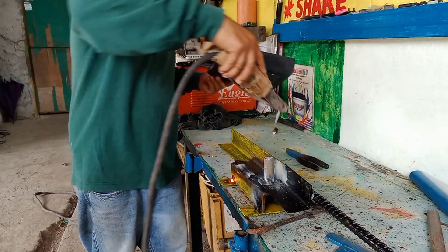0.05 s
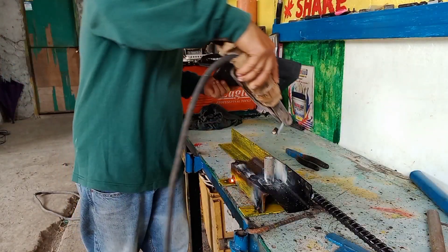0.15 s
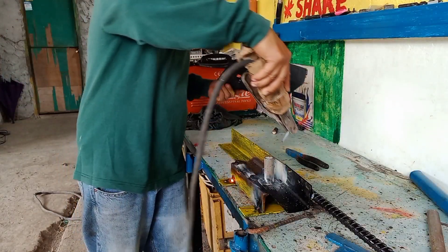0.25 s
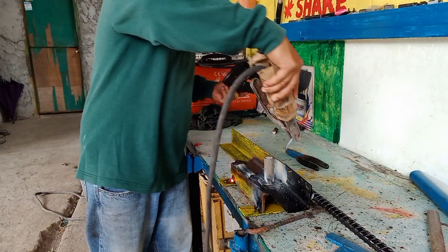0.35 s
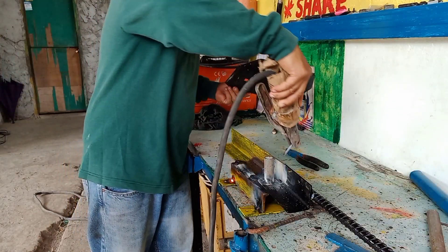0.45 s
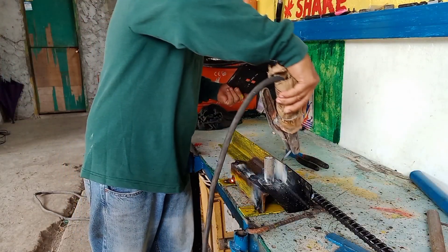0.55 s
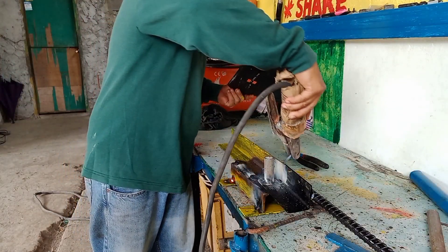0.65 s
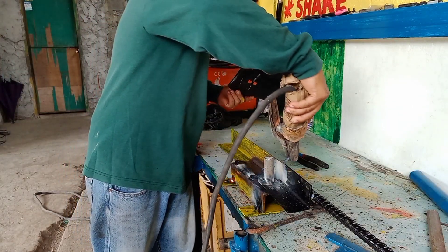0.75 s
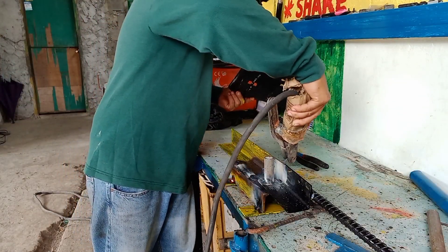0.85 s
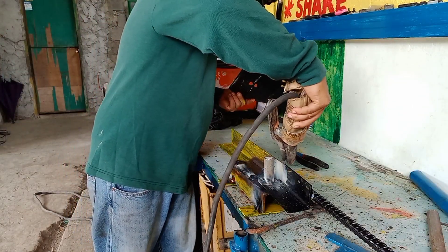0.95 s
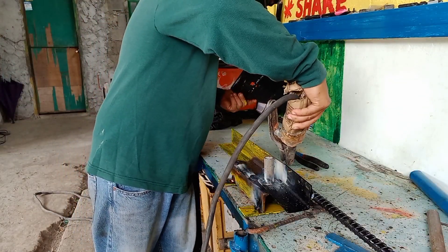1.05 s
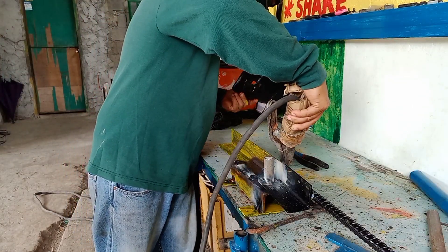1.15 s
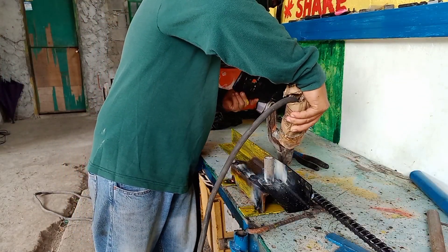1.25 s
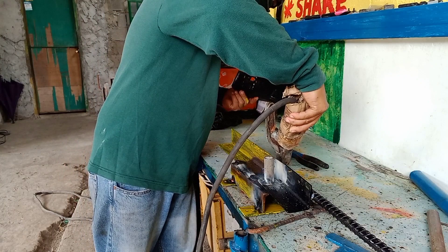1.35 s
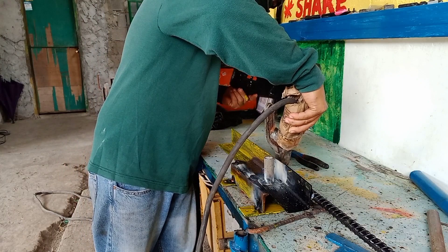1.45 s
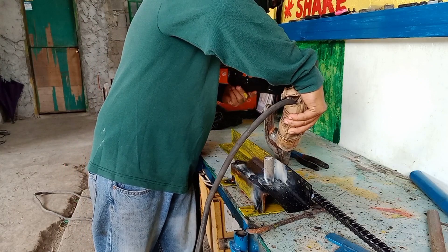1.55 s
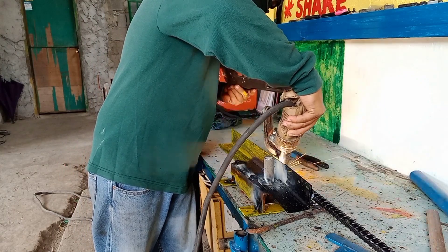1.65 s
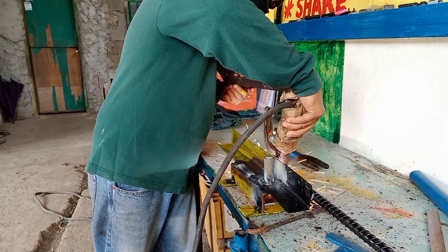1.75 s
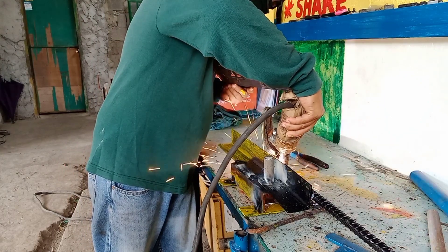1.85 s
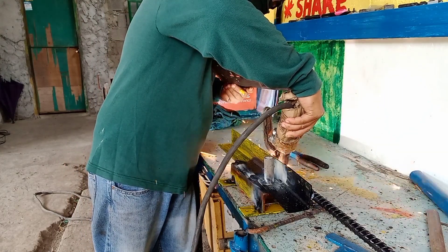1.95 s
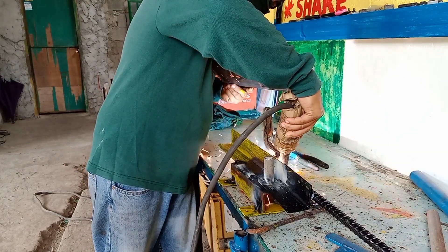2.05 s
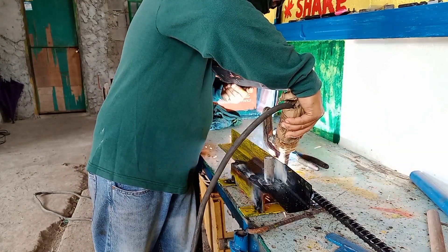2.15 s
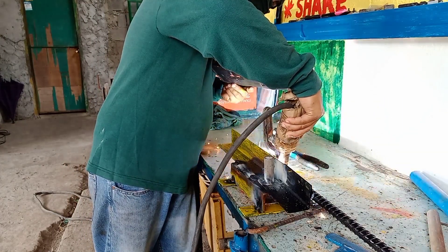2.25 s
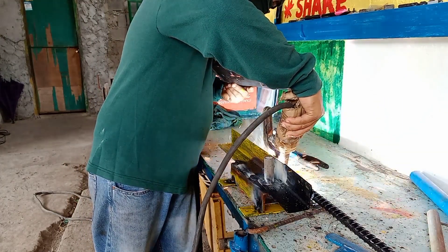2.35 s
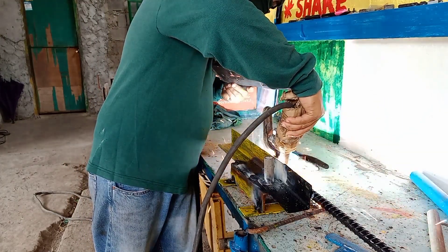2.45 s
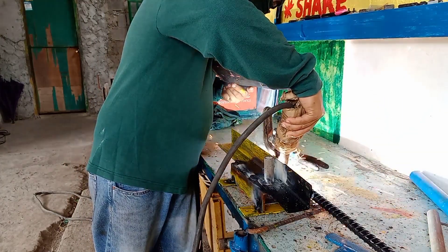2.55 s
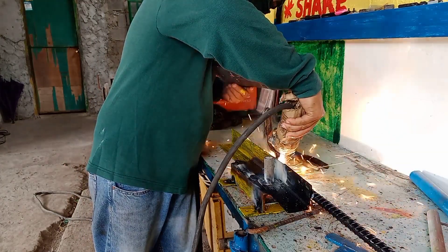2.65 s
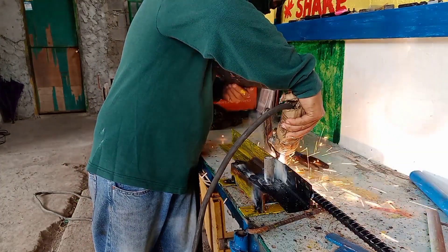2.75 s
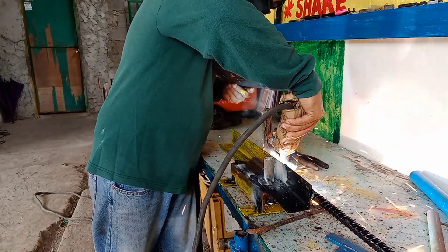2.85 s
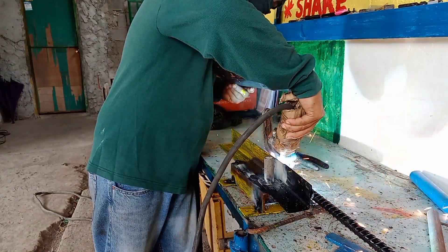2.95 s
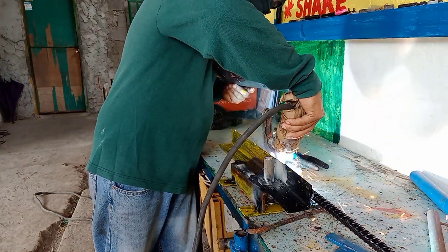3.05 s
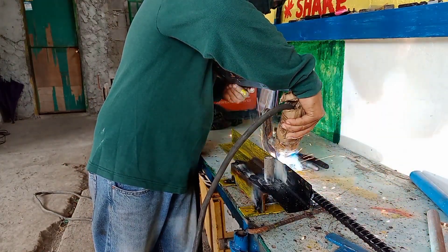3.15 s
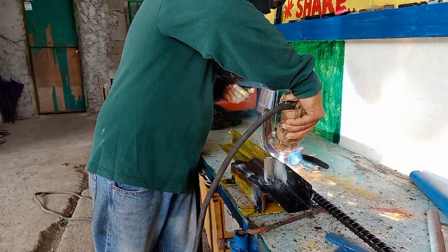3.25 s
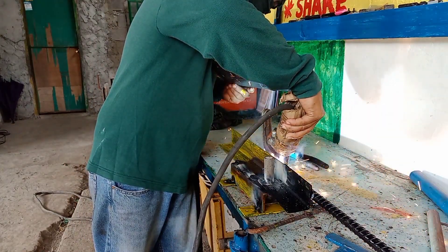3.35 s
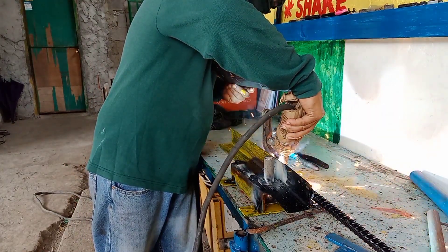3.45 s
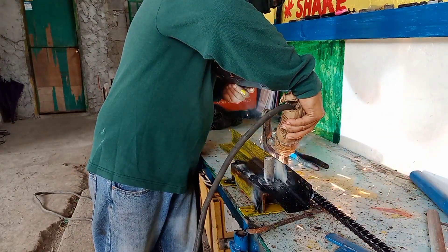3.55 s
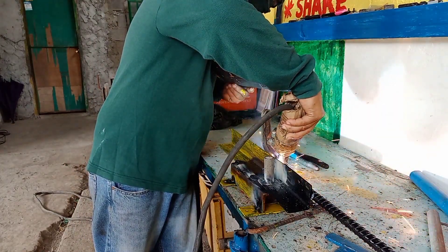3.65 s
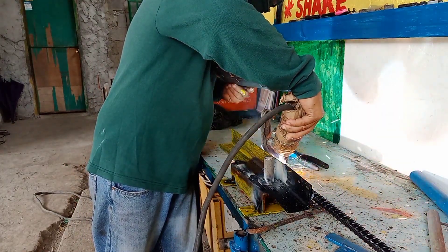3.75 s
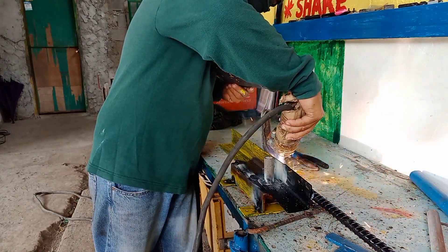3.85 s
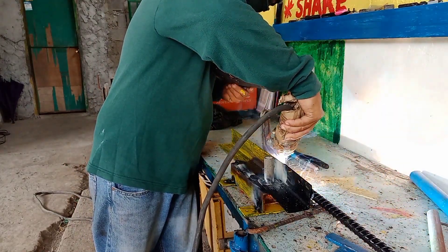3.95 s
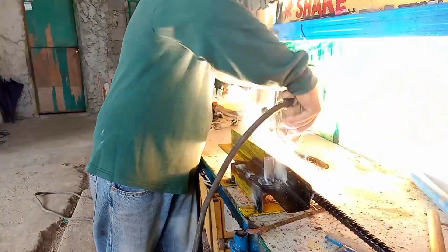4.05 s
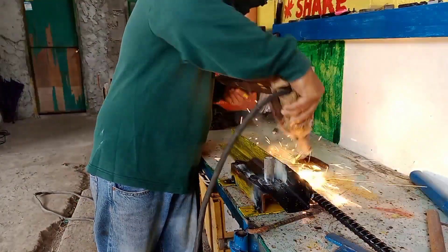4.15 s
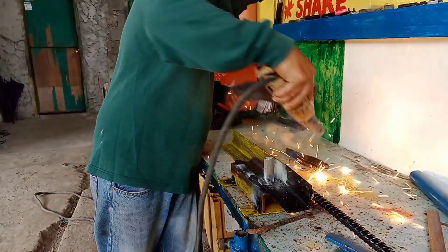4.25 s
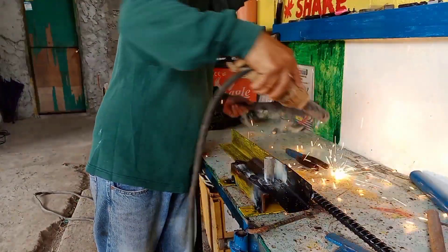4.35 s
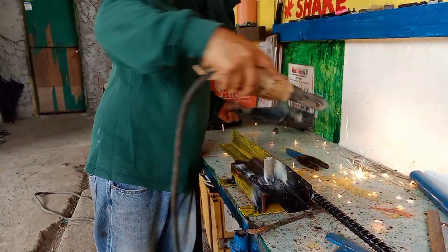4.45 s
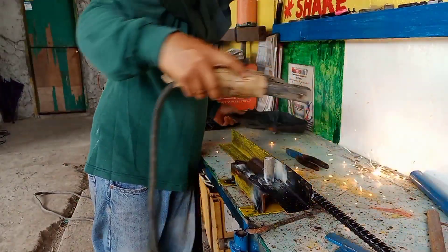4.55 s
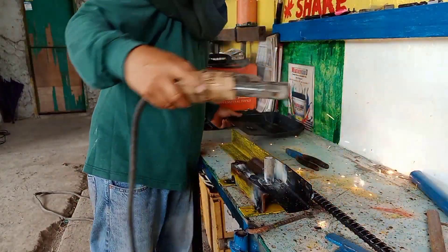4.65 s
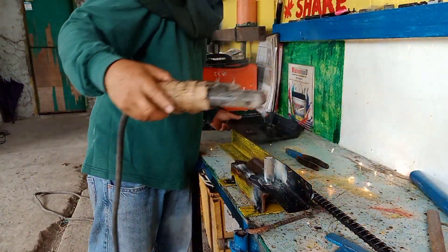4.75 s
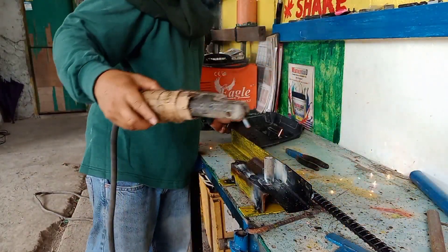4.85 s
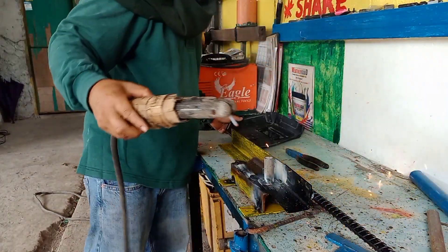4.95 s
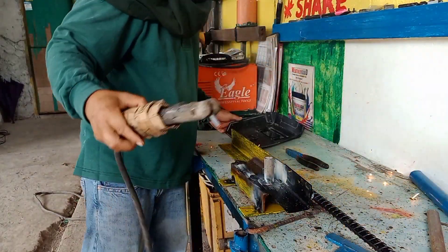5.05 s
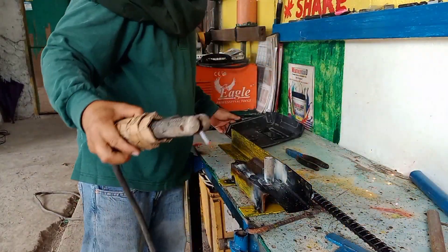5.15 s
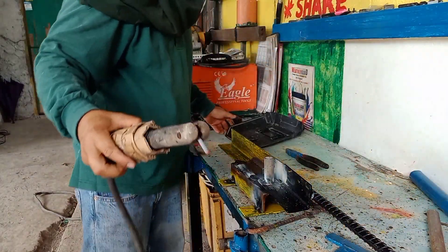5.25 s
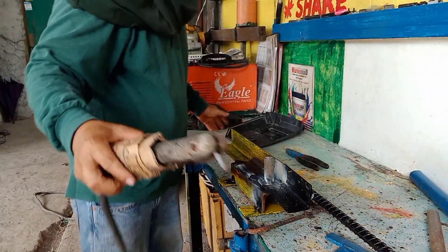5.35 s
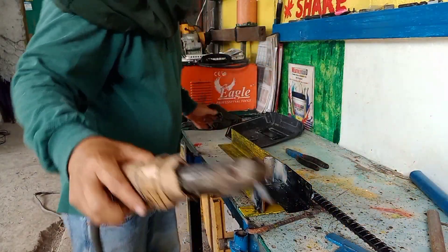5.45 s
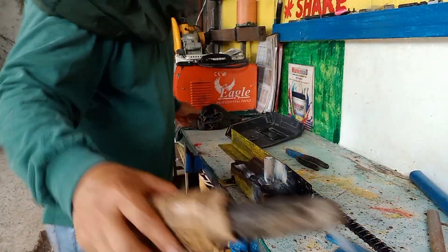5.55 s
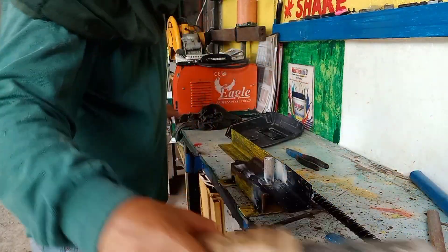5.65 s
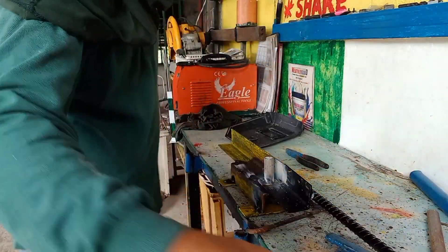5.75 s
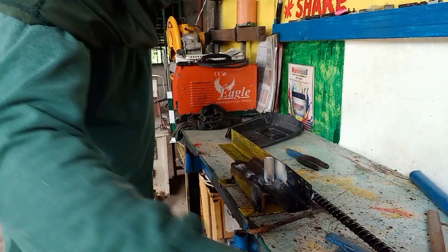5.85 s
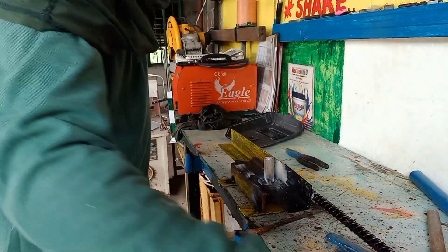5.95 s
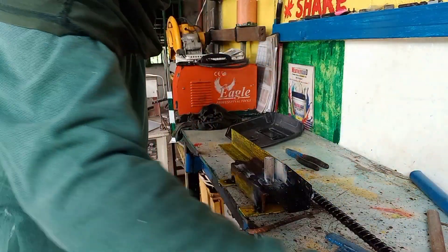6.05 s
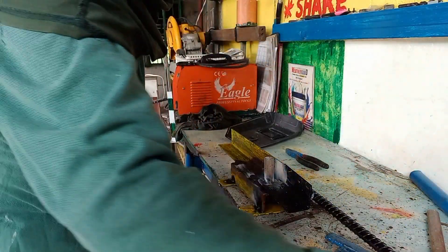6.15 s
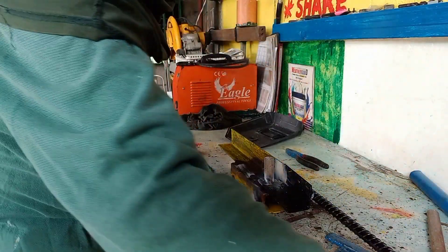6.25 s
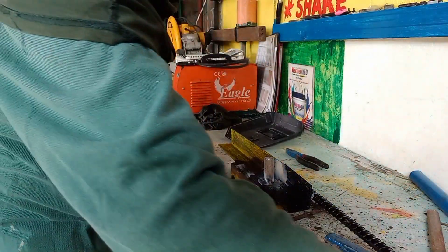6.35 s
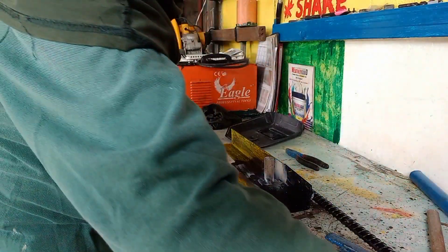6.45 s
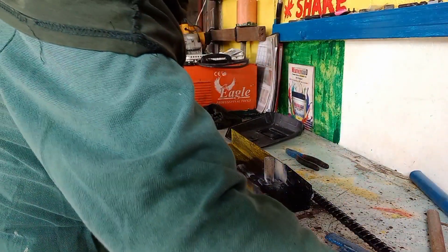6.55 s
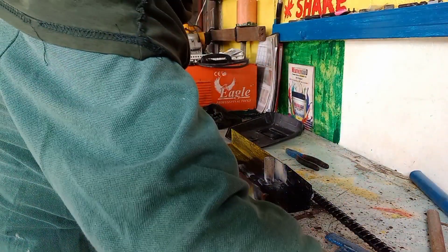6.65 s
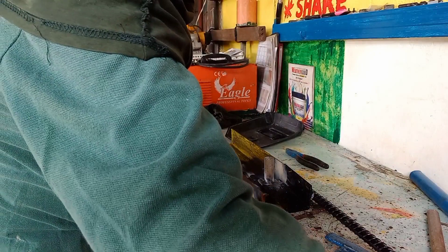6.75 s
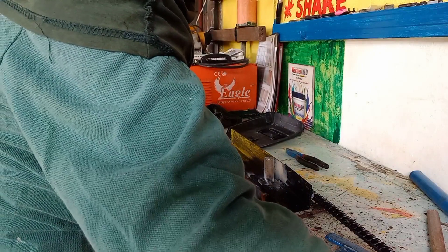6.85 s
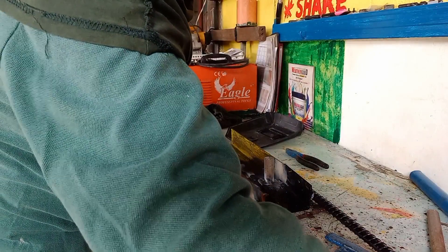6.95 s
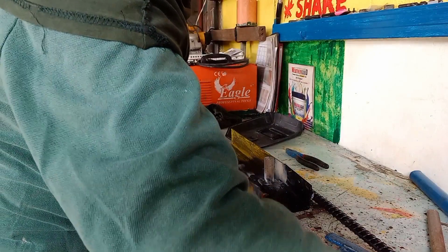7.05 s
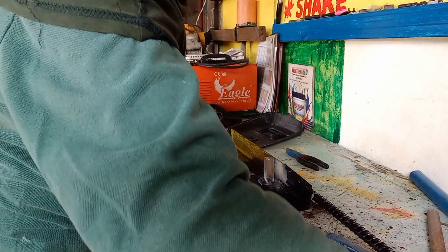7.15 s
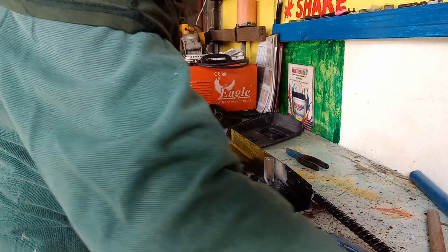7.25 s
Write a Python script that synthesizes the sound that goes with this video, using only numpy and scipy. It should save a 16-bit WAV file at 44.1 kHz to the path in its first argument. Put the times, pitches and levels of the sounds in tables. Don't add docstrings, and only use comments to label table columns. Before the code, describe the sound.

Close stereo sound at a welding bench: quiet scuffs and creaks over a steady hum, then a harsh arc catches, rasping and spitting bright snaps with dull spatter thuds on the microphone. It cuts off after some two and a half seconds, leaving a thin cooling sizzle, small ticks, a bench knock and clothing movement as the hum gradually returns.

```python
import sys
import numpy as np
from scipy import signal
from scipy.fft import rfft, irfft, next_fast_len
from scipy.io import wavfile
from scipy.ndimage import uniform_filter1d

SR = 44100
rng = np.random.default_rng(int(sys.argv[2]) if len(sys.argv) > 2 else 0)


def unload_wav(signal):
    wavfile.write(
        sys.argv[1],
        SR,
        np.round(np.clip(np.atleast_2d(signal).T, -1, 1) * 32767).astype(np.int16),
    )


def boost(x):
    u = np.asarray(x, float) / 20
    return 10 ** u


N = 321482
TIME, PADDED = np.arange(N) / SR, next_fast_len(N, real=True)
RIPPLE_HZ, RIPPLE_PEAK_S = 120.35, 0.0052
BURN_START_S, BURN_END_S = 1.63, 3.95

# time in seconds, level in dB, rise and fall in seconds.
FLARES = [
    (1.651, -22.5, 0.0051, 0.01),
    (1.675, -31, 0.0067, 0.0071),
    (1.698, -10.5, 0.0061, 0.0078),
    (1.762, -39, 0.011, 0.037),
    (4.053, -26, 0.012, 0.015),
]
# time in seconds, gain in dB.
GAIN = [
    (0, 3),
    (1.7, 1.5),
    (3, -11),
    (4.2, -9),
    (5.0, -7),
    (5.28, -1),
    (6, 1),
    (6.6, 2.5),
    (7.3, 3.5),
]


def level(x, db):
    return x * boost(db) / np.sqrt(np.mean(x ** 2))


def curve(table, column, outside=-120):
    rows = np.array(table, float)
    return np.interp(TIME, rows[:, 0], rows[:, column], left=outside, right=outside)


def along_hz(points):
    hz, value = np.transpose(points)
    bins_hz = np.arange(PADDED // 2 + 1) * SR / PADDED
    return np.interp(np.log(bins_hz + 1), np.log(hz), value)


def colour(x, points):
    gain = boost(along_hz(points))
    gain = gain / np.sqrt(np.mean(gain ** 2))
    return irfft(rfft(x, PADDED) * gain, PADDED)[..., :N]


def band(x, hz, width_hz):
    return signal.lfilter(*signal.iirpeak(hz, hz / width_hz, SR), x)


def narrow_band(x, hz, width_hz):
    return band(band(x, hz, width_hz), hz, width_hz)


def walk(rate):
    k = int(SR / rate)
    held = np.repeat(rng.standard_normal(N // k + 1), k)
    return 1.79 * uniform_filter1d(uniform_filter1d(held, k), k)[:N]


def swell(s, rise_s, fall_s):
    span = slice(max(int((s - 8 * rise_s) * SR), 0), min(int((s + 8 * fall_s) * SR), N))
    t = TIME[span] - s
    return span, np.exp(np.where(t < 0, t / rise_s, -t / fall_s))


def swells(rows):
    out = np.zeros(N)
    for s, db, rise, fall in rows:
        span, shape = swell(s, rise, fall)
        out[span] += boost(db) * shape
    return out


def wide(points):
    # frequency in Hz, left-right likeness from -1 to 1.
    likeness = [(60, 1), (300, 0.73), (640, 0.61), (1400, -0.27), (16000, -0.11)]
    alike = np.clip(along_hz(likeness), -1, 1)
    mid, side = rfft(rng.standard_normal((2, PADDED)))
    mid = mid * np.sqrt((1 + alike) / 2)
    side = side * np.sqrt((1 - alike) / 2)
    return colour(irfft(np.array([mid + side, mid - side]), PADDED), points)


def arc():
    # time in seconds, level in dB.
    burning = [(1.626, -50), (1.636, -35.5), (1.69, -23), (1.8, -36), (2.1, -39), (2.5, -34), (2.7, -41.5),
               (2.8, -34), (2.88, -45.5), (2.92, -46), (3.0, -38.5), (3.19, -47), (3.3, -43), (3.7, -42),
               (3.96, -45), (4.05, -41.5), (4.1, -62)]
    # frequency in Hz, level in dB per Hz.
    hiss_tone = [(2350, -83), (4000, -8.5), (5500, -11), (7070, -12.5), (8050, -3), (9850, -8), (10700, -4),
                 (12200, -3), (14400, -3.5), (15300, 0), (16500, -33)]
    # frequency in Hz, level in dB per Hz.
    roar_tone = [(240, -8), (400, -3.5), (693, -2), (912, -6), (1970, 2), (2830, -7), (3310, -3),
                 (4700, -10), (5600, -27), (6500, -85), (11000, -120)]
    ripple = np.cos(2 * np.pi * RIPPLE_HZ * (TIME - RIPPLE_PEAK_S))
    cycle = np.round(RIPPLE_HZ * (TIME - RIPPLE_PEAK_S)).astype(int)
    luck = rng.random(N // 300)[cycle] ** 1.55
    flare = boost(12.3 * (ripple + 1) / 2 * luck + 1.3 * walk(29.76))
    treble = boost(curve(burning, 1) + 1) * flare
    body = boost(curve(burning, 1) - 11) * boost(1.44 * walk(45)) * flare
    growl = swells([(s, db - 16, 0.025, 0.03) for s, db, *_ in FLARES]) * (TIME > BURN_START_S) * flare

    snap, thud = np.zeros((2, N))
    for s, db, body_db, ms in pops():
        span, broad = swell(s, 0.00037 * ms, 0.00046 * ms)
        crack_span, crack = swell(s, 0.00008, 0.0003)
        treble[span] += boost(db + 2) * broad
        treble[crack_span] += boost(db + 7.5) * crack
        body[span] += boost(db + body_db) * broad
        body[crack_span] += boost(db + body_db - 17) * crack
        snap[int(s * SR)] = -boost(db + 14)
        thud[int(s * SR)] = -boost(db + body_db + 13)

    common, *own = rng.standard_normal((3, N)) * boost(3.15 * rng.standard_normal((3, N)))
    plasma = level(common + 0.9 * np.array(own), 0)
    sound = colour(plasma * treble + snap, hiss_tone)
    sound += boost(5) * colour(plasma[:, ::-1] * body + thud, roar_tone)
    sound += boost(10) * band(np.roll(plasma, shift=SR, axis=1) * growl, 1400, 2100)
    sound = signal.lfilter(*signal.butter(2, 87, "high", fs=SR), sound)
    return np.array([sound[0], np.roll(sound[1], shift=13) * boost(-1.5)])


def pops():
    # time in seconds, peak in dB, body minus treble in dB, length in ms.
    singles = [(1.6416, -27, -9, 4.6), (1.777, -14.5, -28, 5.3), (1.8905, -14, -24, 3.5),
               (1.9083, -9, -14, 2.6), (2.0299, -25, -15, 5.6), (2.0477, -18, -14, 1.9),
               (2.2731, -24.5, -10, 8.8), (2.3049, -19.5, -14, 5), (2.3458, -17.5, -13, 3.6),
               (2.3717, -12, -6.5, 2), (2.412, -21.5, -9, 3.3), (2.438, -19.5, -0.5, 1.9),
               (2.4909, -9, -12.5, 1.8), (2.496, -10, -6.5, 1.8), (2.6123, -22.5, -9.5, 5.9),
               (2.6305, -24, -9.5, 5.7), (2.6547, -21.5, -1.5, 0.95), (2.753, -18, -4, 6.1),
               (3.0022, -23.5, -9.5, 2.3), (3.02, -21.5, -14.5, 4.5), (3.097, -26, -16, 5.2),
               (3.119, -20.5, -22, 4.2), (3.234, -19, -18, 1.3), (3.2695, -18.5, -8, 3.1),
               (3.3356, -16.5, -5, 1.1), (3.3683, -22, -7.5, 2.3), (3.585, -18, -9, 4.4),
               (3.6349, -22.5, -4.5, 3.6), (3.6866, -23, -5.5, 1.7), (3.9111, -27, -4, 2.5),
               (3.916, -31.5, -1, 2.7)]
    # time in seconds, first peak in dB, second peak in dB, body minus treble in dB.
    doubles = [(1.6545, -26.5, -19.5, 3), (1.698, -26, -19, -1), (1.7157, -14, -14, -19),
               (1.8071, -14, -15.5, -8), (2.1851, -21, -20, -10), (2.7196, -28, -23, -21),
               (3.1364, -22, -24, -14.5), (3.1607, -19, -12.5, -7.5), (3.2511, -20.5, -31, -6.5),
               (3.385, -19, -21, -17), (3.443, -23, -27, -11.5), (3.4948, -24.5, -26, -18),
               (3.783, -20, -20.5, -11), (3.827, -39, -25, -11), (3.868, -19.5, -22, -5),
               (3.9423, -18.5, -17, -2.5), (4.0425, -42, -34, 1.5)]
    # time in seconds, peak in dB.
    spits = [(1.633, -33), (1.6745, -16), (1.683, -33), (1.733, -36), (1.9015, -26), (1.8397, -26),
             (1.8546, -28), (1.883, -27), (1.9796, -41), (2.0431, -29), (2.0505, -42), (2.056, -35),
             (2.101, -53), (2.1061, -25), (2.25, -28), (2.261, -32), (2.3345, -26), (2.2984, -30),
             (2.432, -25), (2.4804, -22), (2.521, -22), (2.5988, -31), (2.6054, -26), (2.6706, -32),
             (2.679, -34), (2.7367, -27), (2.763, -24), (2.795, -39), (2.813, -38), (2.847, -30),
             (2.878, -29), (2.888, -37), (2.9062, -33), (2.9305, -33), (2.7693, -23), (2.829, -31),
             (2.8623, -30), (2.946, -23), (3.006, -29), (3.045, -40), (3.084, -25), (3.089, -30),
             (3.176, -24), (3.228, -43), (3.3465, -29), (3.311, -33), (3.5191, -26), (3.525, -23),
             (3.536, -27), (3.562, -22), (3.611, -39), (3.629, -39), (3.852, -51), (3.937, -33),
             (3.745, -26)]
    spit_body_db, spit_ms = -19, 3.6
    again_s, double_ms = 0.0093, 3.25

    twice = []
    for s, first_db, second_db, body_db in doubles:
        twice.append((s, first_db, body_db, double_ms))
        twice.append((s + again_s, second_db, body_db - 3, double_ms))
    thin = [(s, db, spit_body_db, spit_ms) for s, db in spits]

    first, last = np.round(np.array([BURN_START_S, BURN_END_S]) * RIPPLE_HZ)
    peaks = np.arange(first, last) / RIPPLE_HZ + RIPPLE_PEAK_S
    luck = rng.standard_normal((len(peaks), 4))
    faint = []
    for k in np.argsort(luck[:, 0])[:int(0.1 * len(peaks))]:
        s = peaks[k] + 0.0017 * luck[k, 1]
        faint.append((s, -37 + 2.5 * luck[k, 2], spit_body_db + 5 * luck[k, 3], spit_ms))
    return singles + twice + thin + faint


def pulses(orders, phase):
    return level(sum(boost(db + 1.5 * walk(20)) * np.cos(k * phase) for k, db in orders), 0)


def buzz():
    # multiple of the ripple, level in dB.
    steady_orders = [(1, 3.5), (2, -8), (3, -17), (4, -8.5), (5, -45), (6, -8.5), (8, -52)]
    # multiple of the ripple, level in dB.
    breaking_orders = [(1, 2.5), (2, 0), (3, -12.5), (4, -10), (6, -7)]
    # time in seconds, level in dB.
    drone_levels = [
        (1.62, -45.5),
        (2.85, -44.5),
        (3.15, -61.5),
        (4.15, -51.5),
    ]
    # time in seconds, level in dB, rise and fall in seconds.
    rattles = [
        (1.64, -28, .003, .013),
        (1.685, -16.5, 0.0065, 0.017),
        (1.75, -32.5, .004, 0.024),
        (4.022, -35.5, 0.0044, 0.028),
        (4.041, -30, 0.0037, 0.0069),
        (4.052, -32, .003, .003),
    ]
    phase = 2 * np.pi * RIPPLE_HZ * (TIME - RIPPLE_PEAK_S) + 0.53
    steady = pulses(steady_orders, phase)
    breaking = pulses(breaking_orders, phase)
    rattle = rng.standard_normal(N) * np.exp(0.34 * np.cos(phase))
    rattle = level(band(band(rattle, 670, 380), 650, 400), -2.4)
    drone = boost(curve(drone_levels, 1))
    flaring = swells(FLARES) * np.where(TIME < BURN_END_S, steady, breaking)
    shake = drone * boost(-6) + swells(rattles)
    return drone * steady + flaring + shake * rattle


def thumps():
    # time in seconds, port, size of pressure step, size of click, click delay in ms.
    hits = [(1.8164, 0, 0.24, -0.77, -0.32), (1.8399, 0, -0.25, 0.069, -0.26),
            (1.8877, 0, -0.0089, -0.23, 0.34), (1.908, 0, 0.44, 0.066, -0.32),
            (2.0562, 0, -0.24, -0.013, 0.041), (2.106, 0, -0.47, -0.46, -0.11),
            (2.4374, 0, -0.42, -0.22, -0.23), (2.5214, 0, 0.4, 0.24, 0.053),
            (2.6705, 0, -0.047, 0.07, -0.11), (2.6789, 0, -0.16, 0.069, 0.22), (2.737, 0, 1, 0.48, -0.12),
            (2.7436, 0, -1.16, -0.79, -0.1), (2.754, 0, -0.15, -1.44, -0.24), (2.7638, 1, 1, 0.51, -0.089),
            (2.7688, 0, -0.19, 0.48, -0.47), (2.9064, 0, 0.46, 0.39, -0.11),
            (2.9295, 0, 0.15, -0.63, -0.39), (2.945, 0, -0.28, -1, 0.091), (2.9458, 1, 0.35, 0.35, -0.096),
            (3.17, 0, 0.0085, -0.52, -0.11)]
    jump, click = np.zeros((2, 2, N))
    for s, port, step, tap, ms in hits:
        jump[port, int(s * SR)] = step
        click[port, int((s + ms / 1000) * SR)] = tap
    push = boost(6.5) * np.cumsum(jump, axis=1) + boost(20) * band(click, 1440, 1070)
    push = signal.lfilter(*signal.butter(2, 5500, fs=SR), push)
    for low_cut_hz in (61, 76):
        push = signal.sosfilt(signal.butter(4, low_cut_hz, "high", fs=SR, output="sos"), push)
    return push


def bead():
    # frequency in Hz, level in dB per Hz.
    sizzle_tone = [(1470, -17), (2500, -9), (3860, -3.5), (5010, -1.5), (5460, -1), (6920, -3.5),
                   (8560, -4.5), (9340, -3.5), (10300, -5), (14400, -6), (15400, -3), (16500, -11.5)]
    # frequency in Hz, width in Hz, level in dB.
    bar_ring = [(8780, 160, -16.5), (10460, 110, -16.5), (12060, 1100, -12.5), (14100, 3400, -10)]
    # time in seconds, level in dB, fall in seconds.
    puffs = [
        (4.049, -28, 0.0049),
        (4.58, -66, 0.022),
    ]
    break_s, start_db, cool_db_per_s = 4.05, -46, 4
    cooling_db = start_db - cool_db_per_s * (TIME - break_s)
    steady = (TIME > break_s) * boost(cooling_db + 0.84 * curve(GAIN, 1))
    hiss = wide(sizzle_tone) * boost(0.16 * walk(28))
    ring = sum(level(band(hiss, hz, width), db) * boost(2.1 * walk(22)) for hz, width, db in bar_ring)
    puffing = swells([(s, db, 0.003, fall) for s, db, fall in puffs])
    return (hiss + ring) * (steady + puffing)


def handling():
    # time in seconds, level in dB, rise in seconds, fall in seconds, centre in Hz.
    scuffs = [(.2, -62.5, 0.23, 0.79, 4660), (6.051, -63, 0.16, 0.25, 2490), (.4, -55, 0.12, 0.11, 1380),
              (.775, -49, 0.0086, 0.073, 1050), (1.27, -63, 0.053, 0.076, 1290),
              (1.382, -55.5, 0.039, 0.053, 1470), (5.4, -60.5, 0.062, 0.082, 1220),
              (5.7, -58.5, 0.055, 0.12, 2190), (6.492, -43, 0.003, 0.053, 280),
              (6.5, -54, .005, 0.045, 900), (6.72, -62, 0.021, 0.036, 740),
              (6.874, -45.5, 0.0029, 0.082, 1580), (6.875, -59, 0.0029, 0.045, 3800),
              (6.95, -43.5, 0.041, 0.028, 670), (7.27, -56, 0.013, 0.061, 1310)]
    # time in seconds, level in dB, rise in seconds, fall in seconds, centre in Hz.
    groans = [
        (.2, -63, .12, 0.4, 55.4),
        (.25, -44.5, 0.069, 0.11, 195),
    ]
    # time in seconds, level in dB.
    creaks = [(.03, -59), (.072, -53), (.335, -53), (.69, -56), (.71, -55), (.895, -52), (1.025, -53),
              (1.1, -59), (1.2, -63), (1.262, -57), (1.3, -53), (1.4, -58), (1.485, -60), (1.572, -66),
              (4.51, -60), (4.77, -54), (5.13, -58), (5.34, -47), (5.42, -55), (5.58, -46), (5.66, -49),
              (5.885, -50), (6.225, -49), (6.28, -57), (6.56, -47)]
    # time in seconds, level in dB, fall in seconds, centre in Hz, width in Hz.
    ticks = [(0.229, -54, 0.097, 1800, 620), (.56, -56.5, 0.026, 1700, 220), (9.2, -54, .015, 2440, 300),
             (0.47, -40, 0.002, 9000, 12000), (4.5823, -27, 0.0011, 2300, 1700),
             (4.586, -46, 0.012, 1800, 390), (4.5816, -38, 0.0022, 11000, 7200),
             (4.2, -40, 0.0071, 640, 950), (4.748, -41, 0.011, 770, 1200), (4.075, -42.5, .05, 490, 150),
             (4.8, -48, 0.0067, 6900, 8000), (6.35, -49, 0.0094, 2000, 710), (7.1, -38, 0.0025, 1900, 700)]
    # frequency in Hz, width in Hz, level in dB.
    bench = [(456, 36, 1), (700, 60, -3), (960, 94, -5), (1227, 39, 1), (2200, 260, -3.5), (2480, 27, -7),
             (4640, 24, -15)]
    bursts = [(*row, 1.2 * row[-1]) for row in scuffs]
    bursts += [(*row, 28) for row in groans]
    bursts += [(s, db, 0.0014, 0.0071, 11800, 9300) for s, db in creaks]
    bursts += [(s, db, 0.0001, fall, hz, width) for s, db, fall, hz, width in ticks]
    out = np.zeros(N)
    for s, db, rise, fall, hz, width in bursts:
        span, shape = swell(s, rise, fall)
        noise = rng.standard_normal(len(shape))
        out[span] += shape * level(narrow_band(noise, hz, width), db)

    blow = np.zeros(N)
    span, shape = swell(6.4862, 0.0006, 0.003)
    blow[span] = shape * rng.standard_normal(len(shape))
    ring = sum(level(band(band(blow, hz, 4 * width), hz, width), db) for hz, width, db in bench)
    return out + boost(-26) * ring / np.abs(ring).max()


def shop():
    # frequency in Hz, level in dB per Hz.
    air_tone = [(18, -55), (30, -39), (98, -2), (190, -13.5), (331, -8.5), (409, -11.5), (592, -14.5),
                (1030, -24), (1890, -26.5), (3300, -33.5), (5000, -32.5), (6800, -39), (8400, -32.5),
                (13000, -32.5), (15200, -32.5), (16500, -32)]
    # frequency in Hz, width in Hz, level in dB.
    fan = [(112.6, 11.6, -50), (223.5, 52, -58.5), (325.4, 9.2, -55.5), (363.6, 1.35, -61.5),
           (601.4, 5.5, -67), (815, 3.3, -69.5)]
    air = level(wide(air_tone), -48) * boost(0.5 * walk(3.1))
    hum = np.zeros(N)
    for hz, width, db in fan:
        tone = narrow_band(rng.standard_normal(N), hz, width)
        hum += level(tone, db) * boost(1.7 * walk(14))
    return signal.lfilter(*signal.butter(2, 55, "high", fs=SR), air + hum)


def room(x, wet_db, t60_s):
    t = TIME[:SR // 2]
    tail = boost(wet_db - 60 * t / t60_s) / np.sqrt(t60_s * SR / np.log(1e6))
    response = rng.standard_normal((2, len(t))) * tail * np.minimum(t / 0.00023, 1)
    return x + signal.fftconvolve(np.atleast_2d(x), response, axes=1)[:, :N]


def scene():
    near = room(arc(), -10, 0.31) + room(handling(), -4, 0.2) + room(buzz(), -6.5, 0.032)
    return near + bead() + shop() * boost(curve(GAIN, 1)) + thumps()


def roll_off(x):
    return signal.sosfilt(signal.butter(12, 16640, fs=SR, output="sos"), x)


def record(dry):
    hold = np.exp(-1 / (0.0076 * SR))
    power = signal.lfilter([1 - hold], [1, -hold], np.mean(dry ** 2, axis=0))
    ducked = dry / (1 + power / boost(-29) ** 2) ** 0.27
    rounded = 0.8 * np.tanh(ducked / 0.8)
    top_cut = signal.ellip(8, 0.15, 35, 15480, fs=SR, output="sos")
    return roll_off(signal.sosfiltfilt(top_cut, rounded))


dry = scene()
out = record(dry)
unload_wav(out)
```